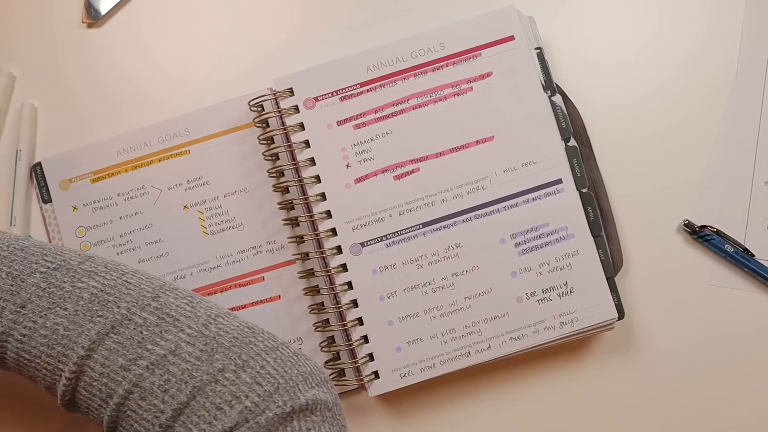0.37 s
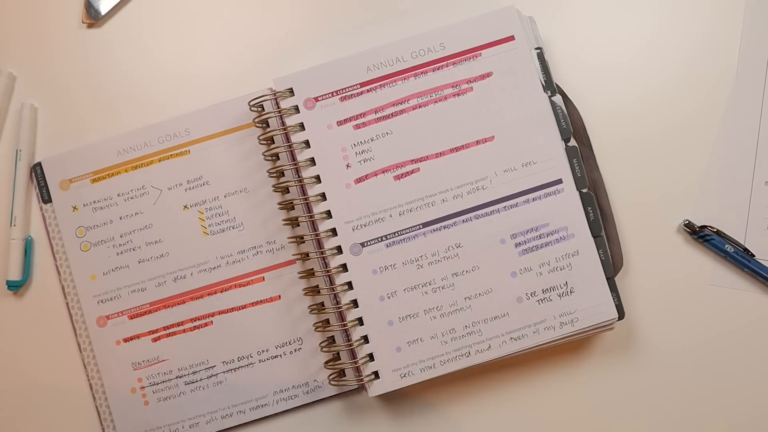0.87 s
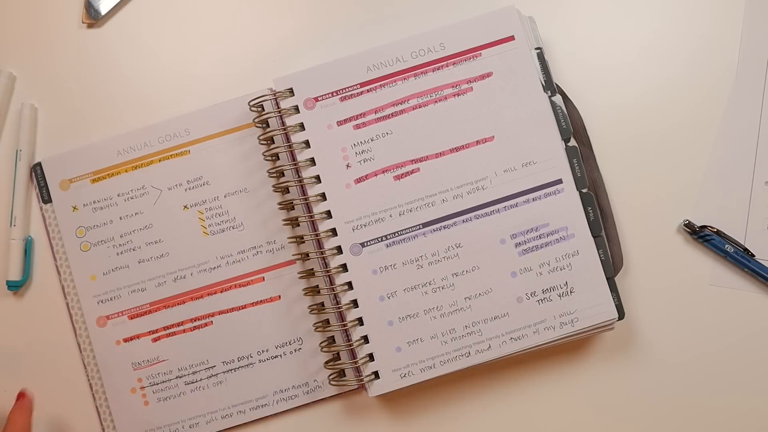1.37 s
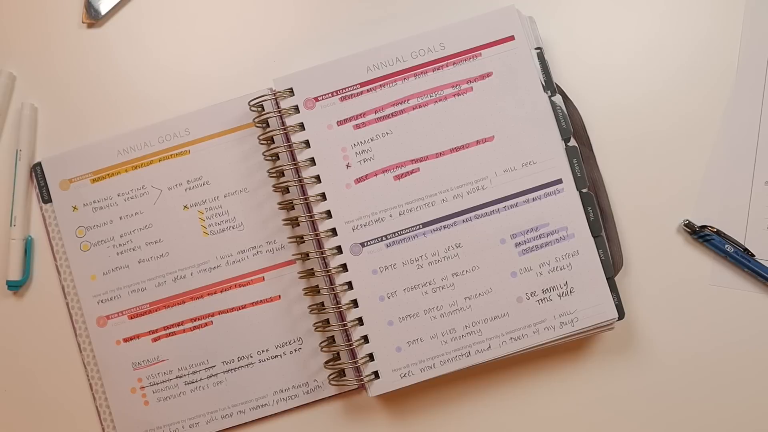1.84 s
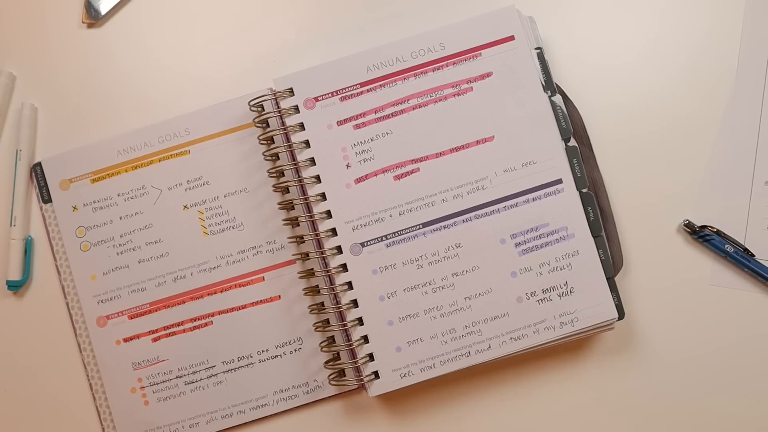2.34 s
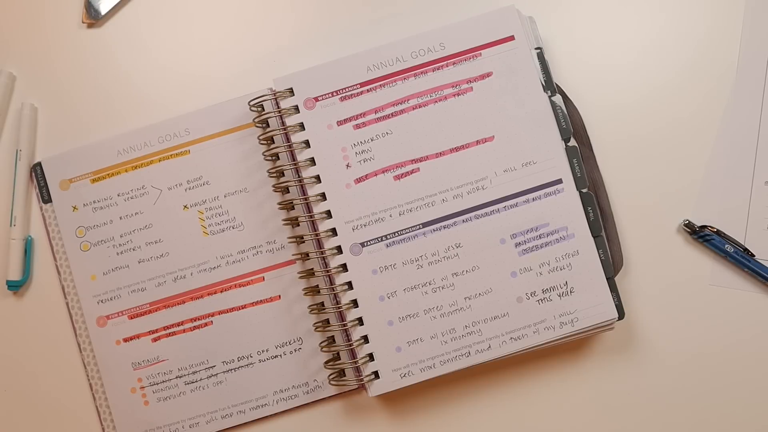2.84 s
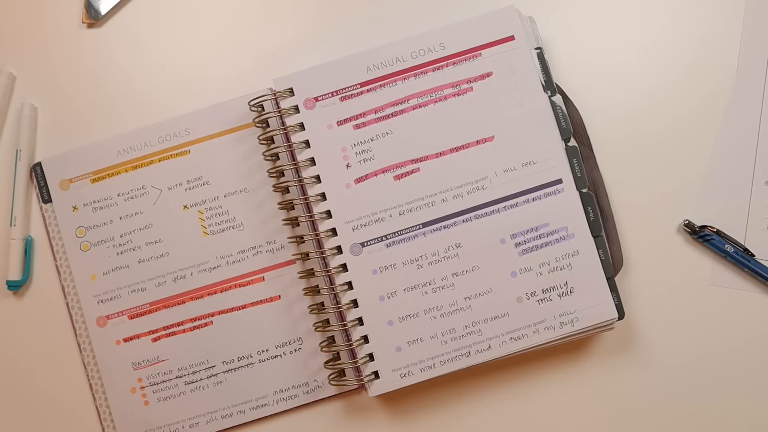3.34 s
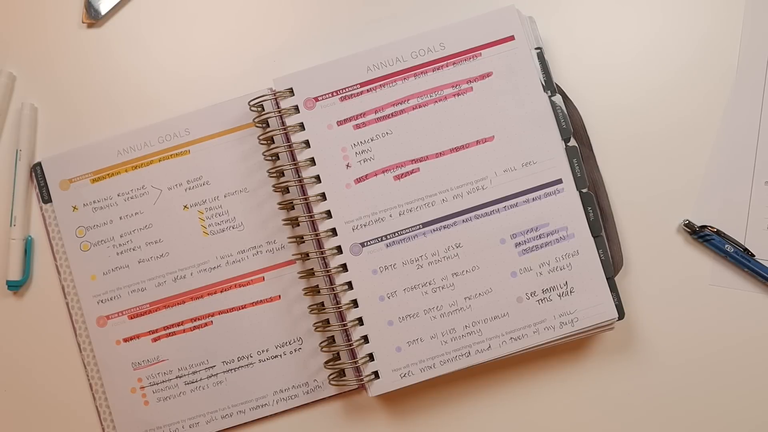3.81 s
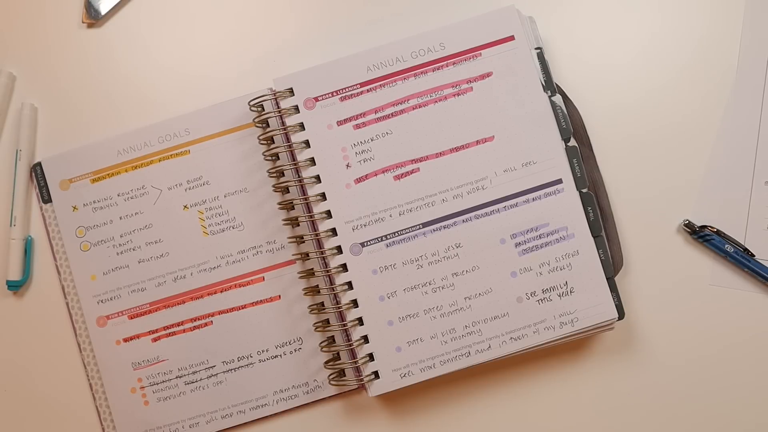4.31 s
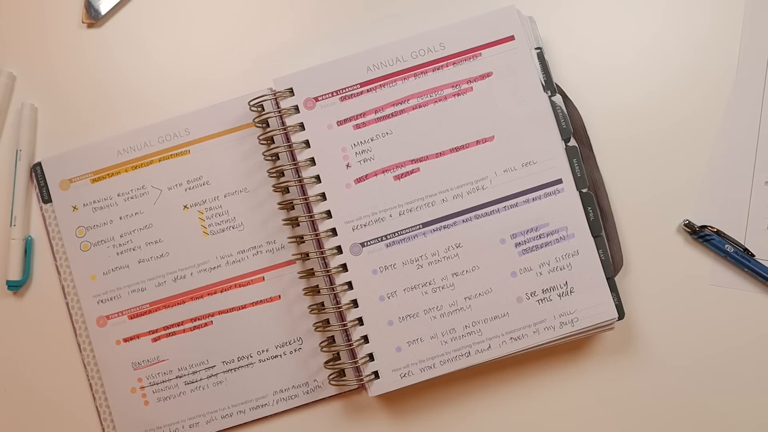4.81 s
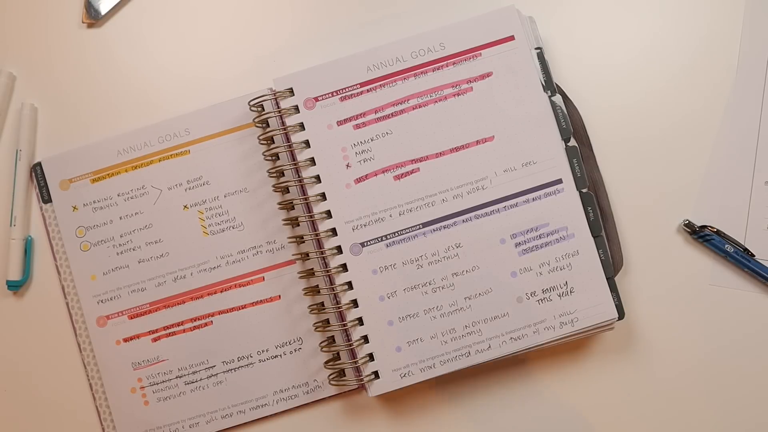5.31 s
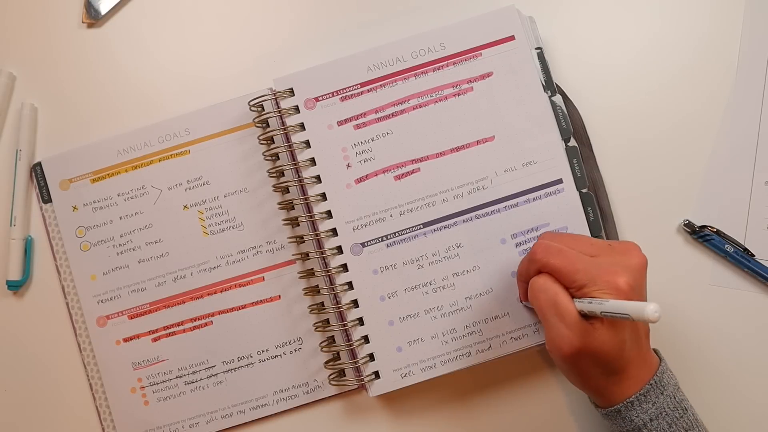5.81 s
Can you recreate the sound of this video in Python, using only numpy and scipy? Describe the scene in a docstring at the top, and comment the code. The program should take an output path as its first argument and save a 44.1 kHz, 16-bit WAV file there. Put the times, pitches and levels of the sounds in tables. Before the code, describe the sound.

A hand rummages among plastic pens in a hollow holder on a desk, rattling and clicking brightly, then scraping and knocking dully in a quiet room.

```python
"""Rummaging among pens

A hand rummages among plastic pens in a hollow holder on a wooden desk, in a small quiet room.
Streams of tiny random slips make the scraping, rattling and soft booming of the strokes.
Single clicks, scuffs, knocks and rubs are short ringing notes and bursts of shaped noise, with a room echo.
A slow sway of the desk and a steady background noise lie underneath."""
import sys
import numpy as np
from scipy import signal
from scipy.fft import rfft, irfft, next_fast_len
from scipy.io import wavfile

SR = 44100
rng = np.random.default_rng(int(sys.argv[2]) if len(sys.argv) > 2 else 0)


def makeup_ratio(level_db):
    """Linear amplitude ratio for a level in decibels (20 dB per factor of ten)."""
    decades = np.asarray(level_db, float) / 20
    return 10 ** decades


def master_out(mix):
    """Clip the mix to full scale and print it as 16-bit PCM to the path in sys.argv[1]."""
    frames = np.transpose(np.atleast_2d(mix))
    ceiling = np.clip(frames, -1, 1)
    pcm = np.round(ceiling * 32767).astype(np.int16)
    wavfile.write(sys.argv[1], SR, pcm)


N = 261067   # length in samples


def rms_one(x):
    """Scales a sound to an rms of 1."""
    return x / np.sqrt(np.mean(x ** 2) + 1e-20)


def in_time(rows):
    """Turns each column of a curve into one value per sample."""
    s, *columns = np.transpose(rows)
    return [np.interp(np.arange(N) / SR, s, c) for c in columns]


def place(s, sound):
    """The sample range that a sound starting at s fills, and the part of it that fits."""
    i = round(s * SR)
    return slice(i, i + len(sound)), sound[:N - i]


def drift(rate_hz):
    """A slow random wander of rms 1: twice-smoothed noise, made at a fortieth of the sample rate."""
    r = np.exp(-80 * np.pi * rate_hz / SR)
    noise = rng.standard_normal(N // 40 + 2002)
    slow = signal.lfilter([1], [1, -2 * r, r * r], noise)[2000:]   # skip the start-up
    return np.interp(np.arange(N) / 40, np.arange(len(slow)), rms_one(slow))


def band(x, low_hz, high_hz, order=2):
    """Keeps only the pitches between two limits (Butterworth band-pass)."""
    return signal.sosfilt(signal.butter(order, [low_hz, high_hz], "band", fs=SR, output="sos"), x)


def ring(clicks, hz, t60):
    """A resonance: a unit click sets off a sine that starts at height 1 and falls 60 dB in t60 seconds."""
    r = makeup_ratio(-60 / (t60 * SR))
    w = 2 * np.pi * hz / SR
    return signal.lfilter([0, np.sin(w)], [1, -2 * r * np.cos(w), r * r], clicks + 1e-18)


def fade_out(t, t60):
    """A steady dying away by 60 dB in t60 seconds."""
    return np.exp(-np.log(1000) * t / t60)


def width_t60(width_hz):
    """The wider a resonance, the sooner it dies away."""
    return np.log(1000) / (np.pi * width_hz)


def grains(per_s, spread_db, clump_db):
    """Tiny slips and touches: random times that come in clumps, a few much stronger than the rest."""
    sizes = makeup_ratio(spread_db * np.minimum(rng.exponential(1, N), 5)) * rng.choice([-1, 1], N)
    chance = per_s * makeup_ratio(clump_db * drift(25)) / SR
    return sizes * (rng.random(N) < chance)


def scattered(slips, low_hz, high_hz, cycles, count):
    """Every slip lands on one of many spots, which rings for some cycles at a pitch of its own."""
    dealt = rng.integers(0, count, N)
    rings = sum(ring(slips * (dealt == k), hz, cycles / hz)
                for k, hz in enumerate(np.geomspace(low_hz, high_hz, count)))
    return rms_one(rings)


# colour of the background noise: (f/Hz, relative level/dB per Hz)
BACKGROUND_COLOUR = [(65, -32), (110, -7), (193, -12), (258, -16), (444, -27), (1950, -28.5),
                     (11000, -40.5), (14400, -36.5), (16000, -45)]


def room_tone():
    """Steady air and microphone noise: random noise coloured along a curve."""
    hz = np.maximum(np.fft.rfftfreq(N, 1 / SR), 1)
    points_hz, points_db = np.transpose(BACKGROUND_COLOUR)
    colour = makeup_ratio(np.interp(np.log(hz), np.log(points_hz), points_db))
    return makeup_ratio(-75) * rms_one(irfft(rfft(rng.standard_normal(N)) * colour, N))


def room(x):
    """Room echo: ten feedback delays, duller on every round."""
    t60_s, wall_cut_hz = 0.24, 5100   # the treble dies sooner than t60_s
    size = next_fast_len(N + SR)
    turn = np.exp(-2j * np.pi * np.arange(size // 2 + 1) / size)   # a delay of one sample
    dull = np.exp(-2 * np.pi * wall_cut_hz / SR)
    wall = (1 - dull) / (1 - dull * turn)
    echo = 0
    for k, lag in enumerate((rng.uniform(.006, .03, 10) * SR).astype(int)):
        loop = makeup_ratio(-60 * lag / SR / t60_s) * wall * turn ** lag
        echo = echo + (-1) ** k * loop / (1 - loop)
    return irfft(rfft(x, size) * echo, size)[:N]


# the desk in motion, also read by rummage(): (t/s, sway level/dB, boom over the holder's note/dB)
DESK_MOTION = [(0.0, -64, -3), (.3, -70, 1.5), (.76, -58.5, 2), (1.1, -66.5, -0.5), (1.4, -60.5, -10),
               (1.7, -65, -3), (2.4, -80, 1), (2.75, -83, -8), (3.0, -63, -3.5), (3.3, -74, -3.5),
               (3.7, -74, 4.5), (4.2, -81, -3), (4.65, -73, -1), (5.05, -61, 5), (5.4, -80, 0.5),
               (5.92, -72.5, -4)]


def shake():
    """The desk sways on its legs in two low modes, each pushed by random noise."""
    push = rng.standard_normal((2, N))
    slow = ring(ring(push[0], 25, 1.3), 25, 1.3)
    quick = ring(ring(push[1], 45, 0.14), 45, 0.14)
    sway_db, _ = in_time(DESK_MOTION)
    return makeup_ratio(sway_db) * (makeup_ratio(-5) * rms_one(slow) + rms_one(quick))


# rubs that make one resonance sing roughly: (t/s, length/s, level/dB, f/Hz, width/Hz)
SINGING_RUBS = [(.11, 0.083, -50, 695, 83), (.28, .14, -60.5, 151, 14), (.46, 0.28, -57.5, 145, 14),
                (0.478, 0.15, -60.5, 700, 47), (1.201, 0.051, -70.5, 1780, 310), (1.29, 0.21, -65, 119, 38),
                (2.402, .3, -61, 560, 370), (2.413, 0.26, -58, 320, 34), (2.6, 0.32, -55.5, 880, 260),
                (2.718, 0.19, -51.5, 510, 33), (2.506, 0.11, -62.5, 1615, 70),
                (3.534, 0.021, -46.5, 1560, 810), (3.835, 0.03, -50, 1580, 134),
                (5.582, 0.081, -71, 2030, 480), (5.801, 0.095, -71, 7500, 900)]


def rubs():
    """Friction noise through one resonance, swelling and fading with the stroke."""
    out = np.zeros(N)
    for s, length, db, hz, width_hz in SINGING_RUBS:
        stroke = np.sin(np.linspace(0, np.pi, round(length * SR))) ** 0.59
        sung = ring(rng.standard_normal(SR // 2), hz, width_t60(width_hz))[-len(stroke):]
        where, part = place(s, makeup_ratio(db) * stroke * rms_one(sung))
        out[where] += part
    return out


# resonances of desk top and holder: (f/Hz, width/Hz, relative level/dB)
DESK_AND_HOLDER = [(76, 53, -6.5), (104.2, 14, -1.5), (145, 12.3, 0), (193.8, 21, 1.5), (230, 12.2, 5),
                   (292.4, 23, 0), (380.7, 28, -1.5), (418, 88, -3), (560, 37, -3), (700, 120, -10)]


def body(x):
    """The resonances of desk and holder, in parallel with alternating signs."""
    return sum((-1) ** k * makeup_ratio(db) * np.sqrt(width) * ring(x, hz, width_t60(width))
               for k, (hz, width, db) in enumerate(DESK_AND_HOLDER))


# soft knocks on holder and desk: (t/s, relative level/dB, f/Hz, t60/s)
SOFT_KNOCKS = [(0.055, -53, 665, 0.22), (0.128, -39, 168, 0.096), (0.165, -34.5, 363, 0.043),
               (0.427, -41, 230, 0.02), (0.501, -51.5, 148.5, 0.35), (0.533, -42.5, 220, 0.078),
               (0.571, -40, 224, 0.084), (0.958, -60, 400, 0.065), (1.047, -53, 404, 0.047),
               (1.283, -32, 342, 0.028), (1.309, -32.5, 385, 0.057), (1.316, -42.5, 100, 0.1),
               (1.326, -44, 382, 0.025), (1.367, -44, 352, 0.015), (1.426, -45, 348, 0.05),
               (2.153, -39.5, 298, 0.07), (2.16, -39, 368, 0.063), (2.189, -43.5, 357, 0.033),
               (2.388, -55.5, 294, 0.13), (2.699, -49.5, 95, 0.24), (2.971, -49, 92, 0.18),
               (3.105, -32, 172, 0.027), (3.124, -36, 74, 0.057), (3.212, -38, 122, 0.053),
               (3.251, -38.5, 119, 0.083), (3.538, -45, 73.5, 0.071), (3.539, -37.5, 140, 0.048),
               (3.563, -41.5, 132, 0.12), (3.625, -45, 184, 0.067), (3.719, -43.5, 518, 0.065),
               (3.923, -48, 295, 0.07), (3.988, -44, 418, 0.033), (4.034, -42.5, 348, 0.041),
               (4.207, -36.5, 427, 0.074), (4.281, -35.5, 457, 0.037), (4.298, -39.5, 265, 0.07),
               (4.338, -47.5, 274, 0.11), (4.552, -35.5, 505, 0.057), (4.575, -41, 588, 0.058),
               (4.69, -41.5, 108, 0.084), (4.763, -36, 130, 0.048), (4.782, -41, 114, 0.12),
               (4.919, -39.5, 106.4, 0.091), (4.937, -42, 114, 0.13), (5.166, -55.5, 99, 0.1),
               (5.229, -52.5, 102, 0.14), (5.444, -63, 391, 0.13), (5.745, -57.5, 429, 0.12)]


def knocks():
    """A soft push sets one short note going, with a puff of noise around it, and stirs the whole body."""
    out, pushes, t = np.zeros(N), np.zeros(N), np.arange(SR // 2) / SR
    for s, level_db, hz, t60 in SOFT_KNOCKS:
        contact = 1 - np.exp(-t * hz / 0.32)   # a gentle start over part of a cycle
        puff = rms_one(band(rng.standard_normal(len(t)), .55 * hz, 1.9 * hz))
        note = np.sin(2 * np.pi * hz * t) + makeup_ratio(-8.5) * puff
        where, part = place(s, makeup_ratio(level_db + 2) * fade_out(t, t60) * contact * note)
        out[where] += part
        pushes[where.start] = makeup_ratio(level_db)
    return out + makeup_ratio(-34) * body(pushes)


# duller scuffs of things pushed against wood and paper:
# (t/s, relative level/dB, centre f/Hz, relative treble level/dB, t60/s)
DULL_SCUFFS = [(0.034, -51, 1900, -59, 0.3), (0.968, -48.5, 950, -74, 0.02),
               (1.055, -44.5, 930, -92, 0.094), (1.885, -51, 1100, -65, 0.2),
               (2.079, -47, 1720, -49.5, 0.061), (2.19, -50, 894, -73, 0.13),
               (2.279, -54.5, 1150, -84, 0.17), (3.013, -43.5, 1300, -49.5, 0.097),
               (3.089, -39, 905, -53.5, 0.33), (3.127, -30, 740, -54, 0.12), (3.179, -36, 1540, -58, 0.053),
               (3.214, -38, 790, -71, 0.08), (3.256, -37.5, 1200, -45, 0.065),
               (3.299, -54, 883, -84, 0.078), (3.321, -75, 1230, -86, 0.078),
               (3.535, -33.5, 1480, -41, 0.067), (3.549, -39, 836, -49.5, 0.16),
               (3.58, -36, 1070, -60, 0.13), (3.619, -30, 1100, -53, 0.11),
               (3.655, -34.5, 1630, -46, 0.091), (3.679, -38, 1150, -50, 0.062),
               (3.727, -25, 1400, -37.5, 0.066), (3.821, -41, 975, -49.5, 0.058),
               (3.989, -53, 1490, -75, 0.29), (4.113, -44.5, 1530, -62, 0.054),
               (4.21, -34.5, 1770, -58, 0.089), (4.282, -40, 1170, -69, 0.11), (4.388, -53, 883, -73, 0.1),
               (4.478, -51, 1180, -74, 0.23), (4.498, -63, 802, -57, 0.078), (4.53, -39, 820, -58, 0.045),
               (4.554, -30.5, 1220, -59, 0.084), (4.574, -47, 1080, -66, 0.12),
               (4.766, -38, 1070, -72, 0.14), (4.789, -45, 1010, -67, 0.11), (4.964, -48, 1130, -63, 0.11),
               (5.461, -49, 1850, -68, 0.048), (5.609, -61, 830, -71, 0.22), (5.749, -58, 1040, -66, 0.2)]


def scuffs():
    """A burst of dense slips that swells within a few ms and dies away, the treble first."""
    out, t = np.zeros(N), np.arange(SR // 3) / SR
    swell = 1 - np.exp(-t / 0.0039)
    for s, level_db, centre_hz, treble_db, t60 in DULL_SCUFFS:
        # the strength jumps every 60 samples, so the noise is grainy
        strength_db = 3.5 * rng.standard_normal(len(t) // 60 + 1).repeat(60)[:len(t)]
        slips = rng.standard_normal(len(t)) * makeup_ratio(strength_db) * swell
        fade = fade_out(t, t60)
        scuff = makeup_ratio(level_db + 2.5) * band(slips * fade, 0.34 * centre_hz, 1.77 * centre_hz)
        scuff += makeup_ratio(level_db - 5) * ring((t == 0) * 1., centre_hz, 0.0086)   # the first contact
        scuff += makeup_ratio(treble_db + 3.5) * band(slips * fade ** 2, 2600, 8100, order=1)
        where, part = place(s, scuff)
        out[where] += part
    return out


# modes of the plastic barrels, also played by chatter(): (f/Hz, relative level/dB, t60/s)
BARREL_MODES = [(1250, -11, .03), (1750, -12, .03), (2450, -7, .045), (2900, -7, .045), (3950, -8, .06),
                (5050, -11, .045), (5750, -8, .05), (7150, -11, .04), (7750, -10, .055), (8700, -14, .03),
                (10400, -14, .025), (11200, -18, .03)]
# hard touches of pen on pen:
# (t/s, relative barrel level/dB, barrel f/Hz, relative tick level/dB, tick f/Hz)
PEN_TOUCHES = [(0.07, -28, 3030, -36, 10200), (0.082, -34, 3180, -34.5, 6000),
               (0.092, -37, 2500, -55, 5740), (0.112, -36, 1770, -48, 5770), (0.125, -30, 2950, -48, 6460),
               (0.134, -31, 1810, -37.5, 6100), (0.16, -34, 810, -39.5, 6240),
               (0.176, -34.5, 1850, -42, 5740), (0.201, -46, 2000, -50, 8760),
               (0.238, -31.5, 2660, -37, 5330), (0.302, -39, 2540, -63, 5750),
               (0.322, -46, 4070, -54, 5000), (0.331, -42.5, 3160, -56, 5330),
               (0.426, -37, 1960, -46, 6340), (0.479, -40, 1550, -56, 5870), (0.496, -42, 1730, -69, 7440),
               (0.506, -37.5, 1580, -49.5, 5340), (0.529, -41, 1660, -58, 7280),
               (0.556, -40, 3000, -52, 5800), (0.567, -38, 3050, -44, 6840), (0.583, -47, 3500, -51, 6960),
               (0.624, -49.5, 3390, -48.5, 6000), (0.65, -53.5, 2780, -65, 4680),
               (0.678, -55, 2730, -60.5, 5600), (0.707, -55.5, 1450, -75, 6830),
               (1.049, -47, 905, -54, 5570), (1.281, -37, 1060, -57, 5860), (1.292, -56, 850, -50, 6980),
               (1.308, -54, 1650, -39.5, 6600), (1.311, -26.5, 1193, -36, 5030),
               (1.367, -30.5, 1220, -41.5, 6300), (1.409, -41, 1100, -45, 5160),
               (1.427, -30, 1240, -38.5, 6940), (1.488, -29.5, 1890, -54, 6100),
               (1.5, -35, 2280, -66, 4500), (1.517, -36, 2170, -67, 4950), (1.533, -39, 1790, -63, 4600),
               (3.237, -57, 1490, -73, 6000), (3.535, -38.5, 1550, -55, 5360),
               (3.592, -41, 1090, -65, 4750), (3.668, -36, 1110, -44, 5400), (3.718, -28, 1590, -45, 7300),
               (3.735, -34, 1410, -46, 5730), (3.821, -37.5, 1010, -61, 5240), (4.683, -50, 830, -56, 6960),
               (4.702, -45.5, 2430, -45, 7920), (4.989, -54, 1010, -68, 7350),
               (5.894, -56, 2720, -78, 7330), (5.912, -51.5, 2010, -79, 7100)]


def pen_clicks():
    """A touch gives a brief barrel note, a high tick and a dying rustle; pens ring on roughly in their modes."""
    gripped_s = 0.8   # the pens lie loose until the hand closes on them
    loose_ring_db, held_ring_db = -18.5, -31
    out, t = np.zeros(N), np.arange(SR // 4) / SR
    touch = (t == 0) * 1.
    for s, barrel_db, barrel_hz, tick_db, tick_hz in PEN_TOUCHES:
        free_db = loose_ring_db if s < gripped_s else held_ring_db
        noise = rng.standard_normal(len(t))
        strength, detune = rng.standard_normal((2, len(BARREL_MODES)))
        crunch = noise * np.exp(-t / 0.00041)
        rustle = noise * fade_out(t, 0.057)
        low = ring(touch, barrel_hz, 0.036)
        low += makeup_ratio(6) * band(rustle, 0.59 * barrel_hz, 2.08 * barrel_hz)
        high = ring(touch, tick_hz, 0.0066)
        high += makeup_ratio(-5) * band(rustle, 5060, 9240)
        high += makeup_ratio(-5) * band(crunch, 4800, 15800)
        high += makeup_ratio(-14.5) * band(rustle, 8500, 14000)
        hit = makeup_ratio(barrel_db - 8) * low + makeup_ratio(tick_db + 5) * high
        rough_touch = touch + makeup_ratio(-16) * rustle
        # every touch excites the modes a little differently
        for (hz, db, t60), own_db, off in zip(BARREL_MODES, 1.5 * strength, 0.0316 * detune):
            driven_db = barrel_db if hz < 4500 else tick_db + 6.5
            hit += makeup_ratio(db + own_db + free_db + driven_db) * ring(rough_touch, hz * (1 + off), t60)
        where, part = place(s, hit)
        out[where] += part
    return out


def chatter():
    """Light uneven touches, each catching one barrel mode and giving a short crack."""
    touches = grains(per_s=120, spread_db=4, clump_db=4.5)
    dealt = rng.integers(0, len(BARREL_MODES), N)
    rings = sum(makeup_ratio(db) * ring(touches * (dealt == k), hz, t60)
                for k, (hz, db, t60) in enumerate(BARREL_MODES))
    return rms_one(rings + makeup_ratio(4) * band(touches, 2500, 14000))


def stroke_shape(s, length):
    """A stroke swells, holds and fades once the hand lets go."""
    swell_share, let_go_t60_s = 0.26, 0.31   # part of the stroke spent swelling; fade after its end
    t = np.arange(N) / SR - s
    swell = np.clip(t / (swell_share * length), 0, 1)
    return swell * makeup_ratio(-60 * np.clip(t - length, 0, 3) / let_go_t60_s)


# strokes of the hand among the pens:
# (t/s, length/s, scrape level/dB, weight on the holder over the scrape/dB, brightness over the scrape/dB)
HAND_STROKES = [(0.03, 0.16, -55, 4.5, 0.5), (0.222, 0.096, -62.5, 0, -1), (0.434, 0.15, -59, 1, -5),
                (.62, 0.12, -73.5, 6, -10), (0.905, 0.09, -79, 1, -5.5), (0.99, 0.26, -73.5, 0, -3.5),
                (1.263, 0.18, -64.5, 13, -0.5), (1.469, 0.14, -63, -10, -7),
                (1.596, 0.51, -62.5, -4, -14.5), (2.024, 0.32, -66.5, -1, -12.5), (2.38, 0.52, -61, 6, -12),
                (2.554, 0.23, -58.5, 5.5, -21), (2.817, 0.24, -62.5, 9, -22.5),
                (3.071, 0.08, -54, 2.5, -20), (3.206, 0.053, -61.5, 10, -6),
                (3.492, 0.065, -67.5, -1.5, -13), (3.554, 0.15, -55.5, 2.5, -7.5),
                (3.64, 0.12, -53, -17, -12), (3.7, 0.14, -57, 1, -14.5), (3.877, 0.35, -70, 9, -12),
                (4.197, .12, -59.5, -5.5, -16.5), (4.34, 0.32, -66.5, 10, -15.5),
                (4.505, 0.068, -53.5, 3, -21), (4.63, 0.25, -65.5, 3.5, -10),
                (4.904, 0.14, -68.5, 6.5, -9.5), (5.081, 0.35, -71, -4, -9),
                (5.409, 0.61, -73.5, -0.5, -3.5), (5.678, 0.17, -73.5, -12, -4.5)]


def rummage():
    """One stream of slips drives the desk, the holder and the pens, so all registers swell together."""
    s, length, level_db, weight_db, bright_db = np.transpose(HAND_STROKES)
    power = np.array([stroke_shape(*row) ** 2 for row in zip(s, length)])

    def pressure(db):
        """The strokes add up in power, each at its own level."""
        return np.sqrt(makeup_ratio(db) ** 2 @ power)

    slips = grains(per_s=9000, spread_db=2.5, clump_db=2)
    thrum = body(slips)
    boom = rms_one(band(thrum, 71, 219))
    hollow = rms_one(band(thrum, 270, 552))
    scrape = scattered(slips, 846, 3420, cycles=4.3, count=16)
    rattle = scattered(band(slips, 2930, 9600), 2680, 7700, cycles=12, count=12)
    hiss = rms_one(band(slips, 9000, 18000))

    _, boom_db = in_time(DESK_MOTION)
    out = pressure(level_db + weight_db) * (hollow + makeup_ratio(boom_db) * boom)
    out += pressure(level_db) * scrape
    out += pressure(level_db + bright_db) * (rattle + makeup_ratio(-5) * chatter())
    # the finest hiss follows about half of the brightness and never quite stops
    out += (pressure(level_db - 20.5 + 0.47 * bright_db) + makeup_ratio(-91)) * hiss
    return out


def scene():
    """The single hits with their room echo, the rummaging, the sway and the steady background."""
    hits = pen_clicks() + scuffs() + knocks() + rubs()
    echo = makeup_ratio(-13.5) * room(hits)
    return (hits + echo + rummage() + shake() + room_tone())[None]


def band_limit(x):
    """A steep low-pass at the top of the band."""
    return signal.sosfilt(signal.butter(12, 16470, fs=SR, output="sos"), x)


def record(dry):
    """A steep low-pass removes the top, 60 dB down from 16.5 kHz upwards."""
    low_pass = signal.cheby2(10, 60, 16500, fs=SR, output="sos")
    finished = signal.sosfilt(low_pass, dry)
    return band_limit(finished)


dry = scene()
out = record(dry)
master_out(out)
```